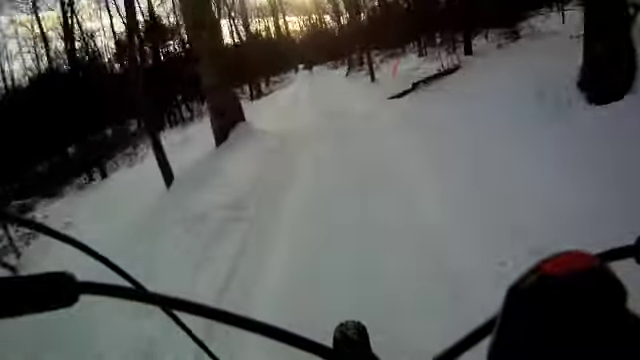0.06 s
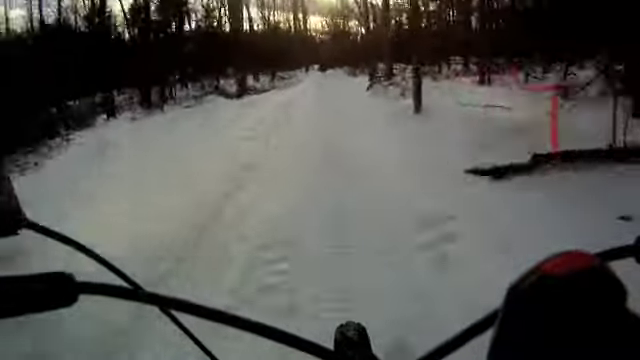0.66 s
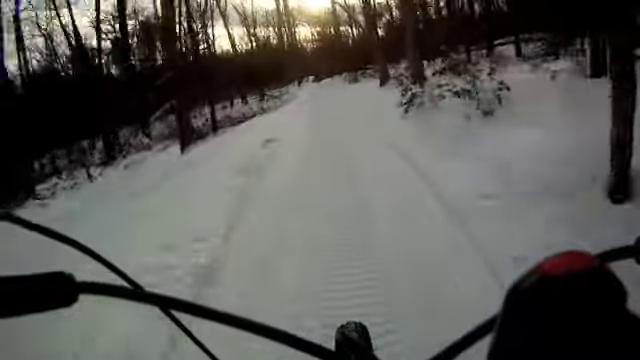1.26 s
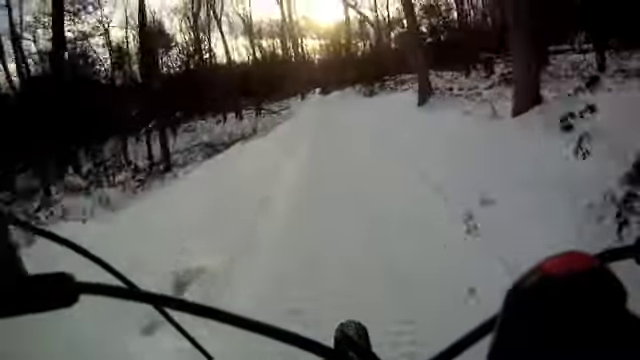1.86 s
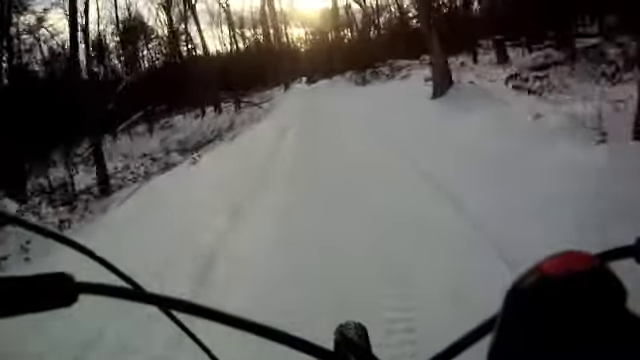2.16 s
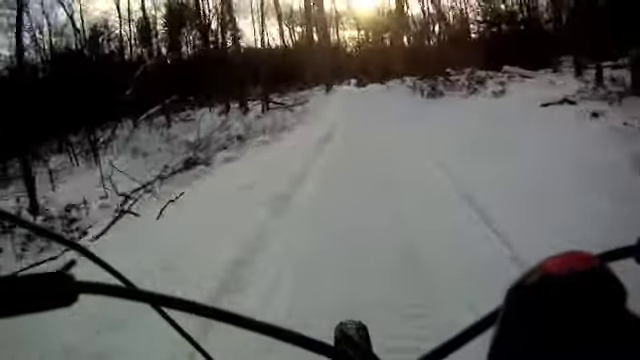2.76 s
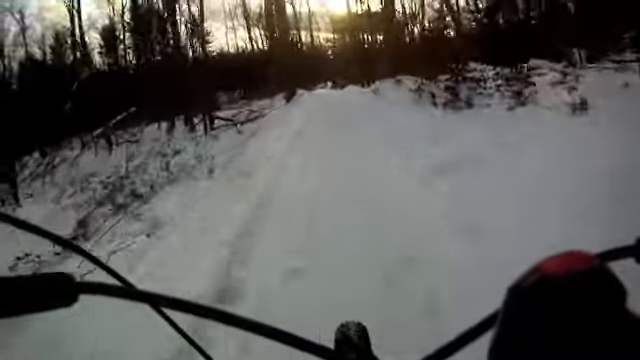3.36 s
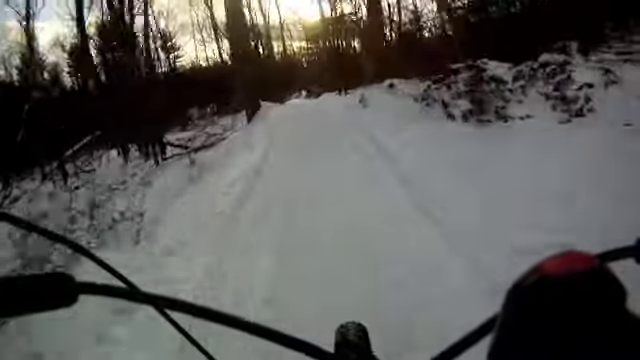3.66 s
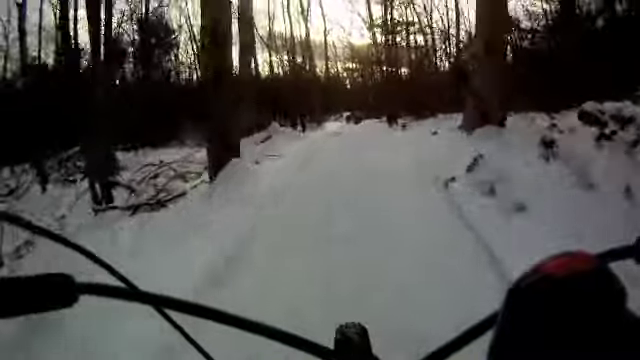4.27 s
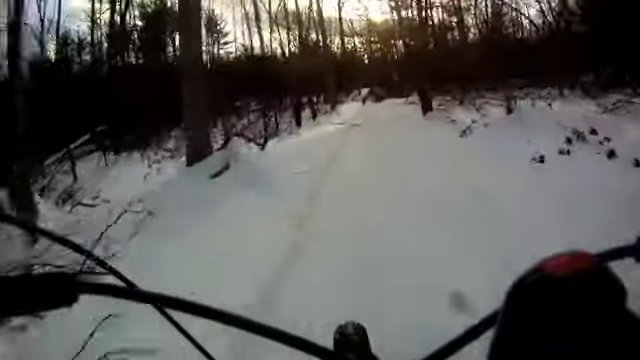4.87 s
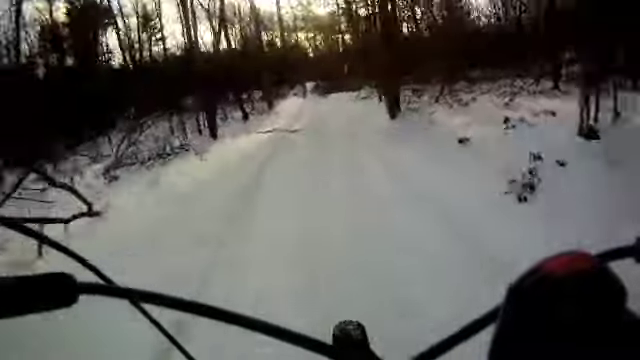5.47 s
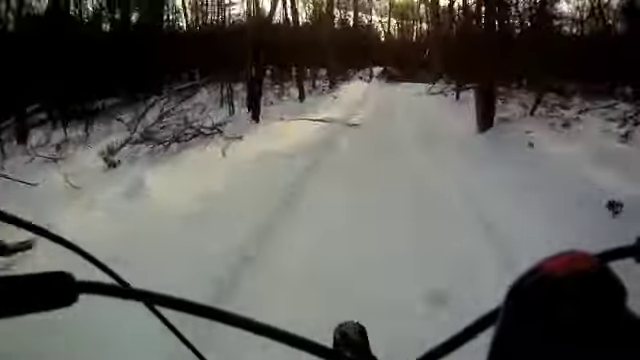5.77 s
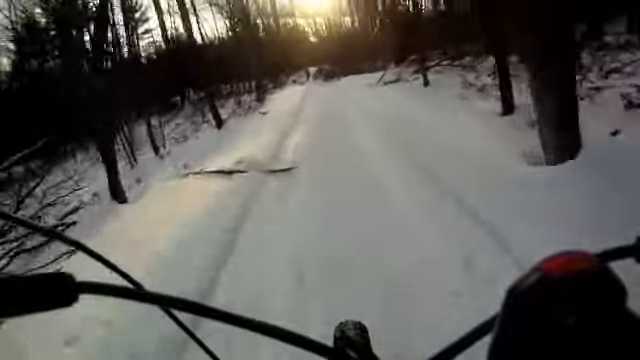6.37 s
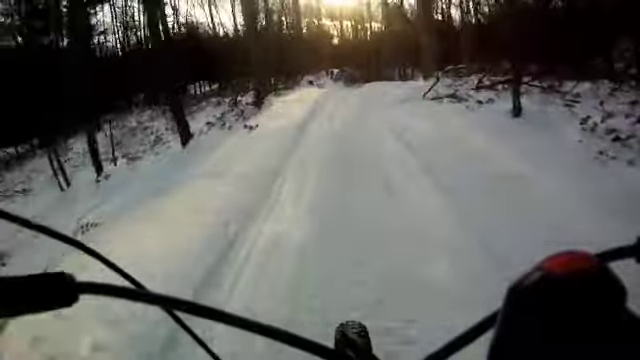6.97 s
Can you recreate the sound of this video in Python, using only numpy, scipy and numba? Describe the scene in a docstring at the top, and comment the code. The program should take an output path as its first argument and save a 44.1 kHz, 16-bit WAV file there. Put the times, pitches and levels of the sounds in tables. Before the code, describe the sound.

Heard through a plastic case at chest height, bike tyres throb and rumble steadily on a snowy woodland trail, with crunching snow, soft low wind and light chain ticks. Scattered hollow knocks grow harder toward the middle, joined by plastic rattling. Two sharp buckle clacks right by the microphone are the loudest moment. A brief gust and a run of creaks and knocks follow before the ride smooths out. The sound is close and boxy, with glassy treble.

```python
"""Bicycle on packed snow

A ride down a snow trail, heard close up from a cased camera on the rider's chest. The tyres drum,
wind buffets the case and crunching snow rings it; the chain ticks, the mount creaks, bumps knock
and a buckle clacks. The camera ducks after hard knocks, clips them, and holds each sample of a
low rate, which mirrors the sound into a glassy treble."""
import sys
import numpy as np
from scipy import signal
from scipy.fft import rfft, irfft
from scipy.io import wavfile
from scipy.ndimage import uniform_filter1d
from numba import njit

SR = 44100
rng = np.random.default_rng(int(sys.argv[2]) if len(sys.argv) > 2 else 0)


def transcribe(signal):
    """Save signal, clipped to [-1, 1], as a 16-bit WAV file at the path in sys.argv[1]."""
    frames = np.atleast_2d(signal).T
    limited = np.clip(frames, -1, 1)
    pcm = np.round(limited * 32767).astype(np.int16)
    wavfile.write(sys.argv[1], SR, pcm)


N = 313551

# Resonances of the plastic walls around the microphone. Each row: pitch in Hz, width in Hz, relative dB.
WALL_MODES = [(1212, 324, 2), (1843, 380, -1), (2430, 1500, -7), (2902, 257, 0.5), (3360, 360, -6.5),
              (4400, 6100, -12)]


def undb(db):
    """Decibels to gain."""
    return 10 ** (np.asarray(db) / 20)


def unit(x):
    """Scale to rms 1."""
    return x / np.sqrt(np.mean(x ** 2))


def curve(table):
    """Rows of (seconds, value) joined by straight lines."""
    return np.interp(np.arange(N) / SR, *np.transpose(table))


def swell(s, half_width_s):
    """A smooth rise and fall, 1 at time s."""
    return np.exp(-((np.arange(N) / SR - s) / half_width_s) ** 2)


def swells(table):
    """The summed rise in dB of rows (centre in seconds, rise in dB, half-width in seconds)."""
    return sum(db * swell(s, half_width) for s, db, half_width in table)


def walk(rate):
    """Random levels held 1 / rate seconds and smoothed twice; rms 1."""
    hold = max(int(SR / rate), 1)
    steps = np.repeat(rng.standard_normal(N // hold + 1), hold)
    return unit(uniform_filter1d(uniform_filter1d(steps, hold), hold)[:N])


def ring(force, modes, size=16384):
    """Pass a force through steep-sided resonances; they ring after the push, never before."""
    f = np.arange(size // 2 + 1) * SR / size
    power = sum(undb(db) ** 2 / (1 + (2 * (f - hz) / width) ** 2) ** 2 for hz, width, db in modes)
    cepstrum = irfft(np.log(power) / 2)
    cepstrum[1:size // 2] *= 2  # fold onto positive time for minimum phase
    cepstrum[size // 2 + 1:] = 0
    response = irfft(np.exp(rfft(cepstrum)))
    return signal.oaconvolve(force, response)[:len(force)]


def grains(rate, spread_db):
    """Tiny random impacts, most of them weak and a few strong."""
    hits = rng.random(N) < rate / SR
    size = np.minimum(rng.exponential(size=N), 5)
    return hits * rng.choice([-1, 1], N) * undb(spread_db * size)


def blow(modes, contact_s, scrape, rise_s=0.00072, size=4096):
    """One push and a scrape that swells and dies with the contact, rung through the modes; peak 1."""
    t = np.arange(size) / SR
    force = scrape * rng.standard_normal(size) * (1 - np.exp(-t / rise_s)) * np.exp(-t / contact_s)
    force[0] += 1
    sound = ring(force, modes, size=size)
    return sound / np.abs(sound).max()


def add(track, s, sound):
    """Mix a sound into the track at time s."""
    i = max(int(s * SR), 0)
    track[i:i + len(sound)] += sound[:max(N - i, 0)]


@njit
def follow(size, attack, release):
    """Envelope that rises at one rate and sinks at another."""
    out, level = np.empty(len(size)), 0.
    for i in range(len(size)):
        level += (size[i] - level) * (attack if size[i] > level else release)
        out[i] = level
    return out


def wind(flutter_db=1.5):
    """Eddies buffet the case, right at the microphone, in quick, uneven puffs."""
    # Bands of the buffeting. Each row: centre in Hz, width in Hz, relative dB.
    bands = [(102, 39, -1), (158, 122, -4.5), (320, 380, -13)]
    # The wind between gusts, slowly easing. Each row: time in seconds, level in dB.
    breeze = [(0, -26.5), (1.2, -29.5), (4.3, -32.5), (4.95, -36.5), (7.11, -33)]
    # A gust on top. Each row: centre in seconds, rise in dB, half-width in seconds.
    gusts = [(5.17, 9, .12)]
    eddies = rng.standard_normal(N) * undb(flutter_db * walk(35))
    return unit(ring(eddies, bands)) * undb(curve(breeze) + swells(gusts))


def hoots(half_width_s=0.012):
    """Brief low tones from the bike that swell and fade."""
    # Each row: centre in seconds, pitch in Hz, peak in dB.
    tones = [(.175, 315, -17.5), (.372, 298, -22), (5.51, 345, -18.5)]
    t = np.arange(N) / SR
    return sum(undb(db) * swell(s, half_width_s) * np.sin(2 * np.pi * hz * t) for s, hz, db in tones)


def mount(chatter_db=-44.5, rough_rise_db=12.5, jolt_db=4.5, creak_hz=2080, focus_db_per_octave=9):
    """The camera's plastic joint slips in tiny steps: a chatter on rough ground, a creak when wrenched."""
    # Resonances of the joint. Each row: pitch in Hz, width in Hz, relative dB.
    modes = [(1280, 160, -3.5), (1683, 72, 1), (1926, 135, 5), (2126, 60, -2.5), (3495, 660, -8.5),
             (5446, 420, -7)]
    # Ruts that shake it. Each row: centre in seconds, level in dB, half-width in seconds.
    ruts = [(3.311, -23, 0.056), (3.54, -24, 0.024), (3.765, -25, 0.11), (4.24, -23.5, 0.069),
            (4.468, -29.5, 0.04), (6.736, -35, 0.16)]
    # Creaks. Each row: start in seconds, peak in dB, decay time in seconds.
    creaks = [(3.502, -13, 0.016), (3.803, -12, 0.016), (5.345, -7, 0.0088), (5.676, -13.5, 0.0037),
              (5.742, -2.5, 0.013), (5.99, -16, 0.0061), (6.012, -17.5, 0.0087), (6.04, -9, 0.0015)]
    slips = grains(rate=1200, spread_db=3.3) * undb(jolt_db * walk(110))
    ground = undb(chatter_db + rough_rise_db * swell(4.26, half_width_s=0.79))
    shaking = sum(undb(db) * swell(s, half_width) for s, db, half_width in ruts)
    out = unit(ring(slips, modes)) * np.hypot(ground, shaking)
    # a creak feeds mainly the modes near its own slip rate
    creak_modes = [(hz, width, db - focus_db_per_octave * abs(np.log2(hz / creak_hz)))
                   for hz, width, db in modes]
    for s, db, decay_s in creaks:
        add(out, s, undb(db) * blow(creak_modes, decay_s, scrape=3., rise_s=0.0057))
    return out


def chain(links_per_s=31, tick_s=0.0014, uneven_db=1.5, burst_db=1.6, catch_gain_db=4):
    """Links tick on the sprockets below in a light, uneven run that comes in bursts; some catch harder."""
    # Resonances of the chain. Each row: pitch in Hz, width in Hz, relative dB.
    modes = [(1870, 410, 3.5), (2950, 240, -14), (3603, 360, 6), (4330, 1200, -8.5)]
    # The light ticking. Each row: time in seconds, level in dB.
    run_levels = [(0, -39.5), (.6, -40.5), (1.55, -41.5), (2.3, -41), (2.8, -37), (3.2, -36), (4.7, -35),
                  (6.3, -44), (7.11, -42)]
    # Hard catches. Each row: start in seconds, peak in dB before catch_gain_db.
    catches = [(.5665, -17.5), (1.103, -21), (1.1502, -21), (1.833, -15), (1.8658, -8), (1.9016, -11),
               (2.403, -13.5), (2.467, -18.5), (2.4906, -16.5), (2.605, -16.5), (2.9326, -11),
               (2.9426, -11.5), (2.9576, -10), (2.999, -13.5), (3.4286, -20.5), (3.6737, -15),
               (3.7947, -14.5), (3.8386, -11.5), (4.6014, -17), (4.6783, -16), (5.4897, -18), (5.552, -18)]
    link_phase = np.cumsum(links_per_s * (1 + .3 * walk(30))) / SR % 1
    force_db = uneven_db * walk(30) + burst_db * walk(5)
    ticks = np.exp(-link_phase / links_per_s / tick_s) * undb(force_db) * rng.standard_normal(N)
    out = unit(ring(ticks, modes)) * undb(curve(run_levels))
    for s, db in catches:
        own_colour = [(hz, width, mode_db - rng.standard_normal()) for hz, width, mode_db in modes]
        catch = blow(own_colour, contact_s=0.0021, scrape=.7, rise_s=0.00038)
        add(out, s, undb(db + catch_gain_db) * catch)
    return out


def snow(boom_db=-24.5, crunch_db=-33.5, firming_db_per_s=-0.21, patchy_db=1.34, clump_db=2.0):
    """Snow collapses under the tyres in clumps of grains, which boom in the case and rasp in its walls."""
    # Low resonances of the case. Each row: pitch in Hz, width in Hz, relative dB.
    boom_modes = [(348.4, 46, -13), (518.6, 50.3, -1), (563, 103, -3.5), (666, 142, -8), (919, 105, -15.5)]
    # Soft snow where the tyres dig in. Each row: centre in seconds, boom rise in dB, half-width in seconds.
    soft_patches = [(.18, 2.5, 0.053), (.47, 4.5, 0.019), (.68, 1.5, 0.064), (1.84, 11, 0.083),
                    (2.96, 7, .06), (3.3, 5.5, 0.037), (3.78, 5, 0.082), (4.05, 4.5, 0.16),
                    (4.26, 5, 0.068), (4.66, 4, 0.042), (5.16, 4.5, 0.054), (6.77, 6, 0.04)]
    dig_db = swells(soft_patches) + patchy_db * walk(12)
    fade_db = firming_db_per_s * np.arange(N) / SR  # the crunch fades as the trail gets firmer
    clumps = undb(clump_db * walk(170))
    boom = unit(ring(clumps * grains(rate=4000, spread_db=1.5), boom_modes))
    crunch = unit(ring(clumps * grains(rate=5000, spread_db=2.5), WALL_MODES))
    return boom * undb(boom_db + dig_db) + crunch * undb(crunch_db + fade_db + .85 * dig_db)


def tread(knob_hz=70, waver=0.02264, throb_db=4.0, shake_db=-4.0, bounce_db=1.6, rumble_db=-12):
    """Tyre knobs drum and throb with the load; the uneven trail shakes the frame and adds a rumble."""
    # Resonances of the frame, deepest first. Each row: pitch in Hz, width in Hz, relative dB.
    frame_modes = [(30.3, 12.5, -13.5), (50, 33, -7.5), (66.7, 63, -13), (80.2, 20, -1)]
    # Load on the tyres, heard as their drumming. Each row: time in seconds, relative level in dB.
    load = [(0, -15), (1.05, -11), (1.9, -11.5), (3.15, -14.5), (3.45, -18), (3.58, -15), (4.3, -12.5),
            (4.85, -17.5), (5.1, -12), (5.75, -22), (6.1, -15), (7.11, -16)]
    phase = 2 * np.pi * np.cumsum(knob_hz * (1 + waver * walk(14))) / SR
    knobs = unit(np.sin(phase) * undb(throb_db * walk(22.21)))
    shake = unit(ring(rng.standard_normal(N), frame_modes))
    drum = unit((knobs + undb(shake_db) * shake) * undb(bounce_db * walk(14)))
    rumble = unit(ring(rng.standard_normal(N), frame_modes[:1]))
    return (drum + undb(rumble_db) * rumble) * undb(curve(load)) / np.sqrt(2)


def bumps(clack_boom_db=-11):
    """A knock cracks in the walls and booms as the case is shoved; a buckle clacks harder and brighter."""
    # Resonances of the shoved case and the buckle. Each row: pitch in Hz, width in Hz, relative dB.
    shove_modes = [(538, 79, 4.5), (609, 122, 1), (935, 235, -14.5)]
    buckle_modes = [(644, 153, -7), (1050, 270, -8), (1690, 360, 0.5), (1985, 106, 7.5), (2760, 860, -0.5),
                    (3680, 510, 3.5), (4530, 3900, -10.5)]
    # Bumps in the trail. Each row: start in seconds, boom peak in dB, crack peak in dB.
    knocks = [(.482, -10.5, -17.5), (.546, -8.5, -28), (.662, -10, -23), (.816, -15, -16),
              (1.866, -1, -14.5), (2.02, -10, -14.5), (2.417, -8.5, -29), (2.957, -11, -9),
              (3.357, 0, -5.5), (3.806, -7.5, -14), (4.502, 3.5, -6.5), (4.628, -8, -11.5), (5.023, -9, -9),
              (5.223, -9.5, -32), (5.4, -0.5, -17), (5.502, -3.5, -14), (5.563, -10.5, -10),
              (5.747, -12, -8), (5.855, -13.5, -22), (6.122, -13, -11), (6.369, -12, -19.5),
              (6.411, -10.5, -23)]
    # The buckle hits the case, right by the microphone. Each row: start in seconds, peak in dB.
    clacks = [(4.7274, 17), (4.85, 11.5)]
    out = np.zeros(N)
    for s, boom_db, crack_db in knocks:
        add(out, s, undb(crack_db) * blow(WALL_MODES, contact_s=0.0036, scrape=0.51, rise_s=0.0005))
        add(out, s, undb(boom_db) * blow(shove_modes, contact_s=0.0024, scrape=0.58, rise_s=0.0013))
    for s, db in clacks:
        add(out, s, undb(db) * blow(buckle_modes, contact_s=0.002, scrape=1.7, rise_s=0.0028))
        add(out, s, undb(db + clack_boom_db) * blow(shove_modes, contact_s=0.0023, scrape=0.3))
    return out


def scene():
    """Everything reaches the one microphone at chest height through the case."""
    return (tread() + wind() + snow() + mount() + chain() + bumps() + hoots())[None]


def record(dry, band_hz=5400, ceiling=0.36, attack_s=0.0023, release_s=0.085, hold_hz=12000, top_hz=15300):
    """The camera: narrow-band input, a limiter too slow for the first cycles, clipping, stepped output."""
    narrow = signal.sosfilt(signal.butter(14, band_hz, fs=SR, output="sos"), dry[0])
    envelope = follow(np.abs(narrow), 1 / (attack_s * SR), 1 / (release_s * SR))
    limited = narrow * ceiling / np.maximum(envelope, ceiling)
    clipped = np.clip(signal.resample(limited, round(N * hold_hz / SR)), -.85, .85)
    # holding each sample mirrors every resonance about the hold rate
    stepped = signal.resample(np.repeat(clipped, 4), N)
    top_cut = signal.ellip(10, .2, 80, top_hz, fs=SR, output="sos")
    return signal.sosfilt(top_cut, stepped)[None]


dry = scene()
out = record(dry)
transcribe(out)
```